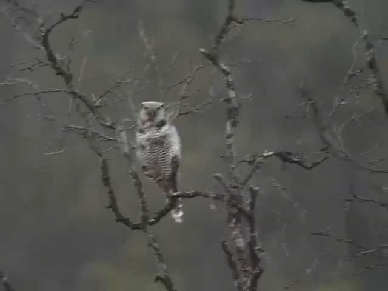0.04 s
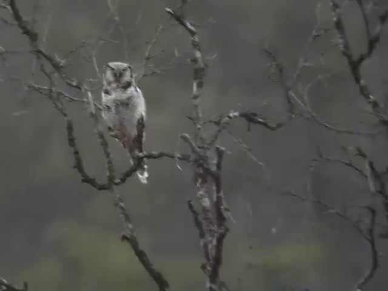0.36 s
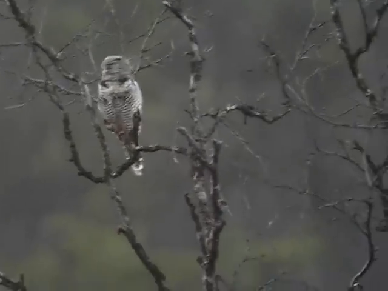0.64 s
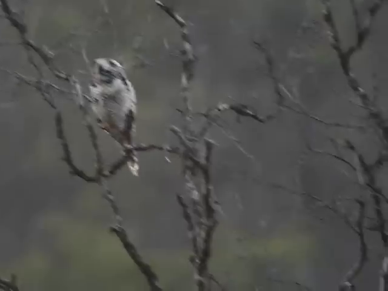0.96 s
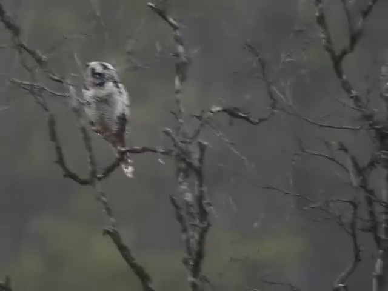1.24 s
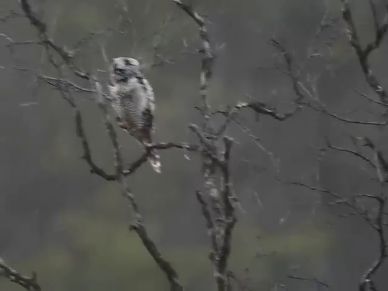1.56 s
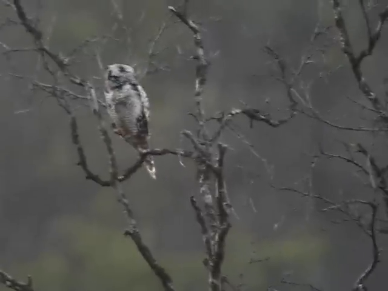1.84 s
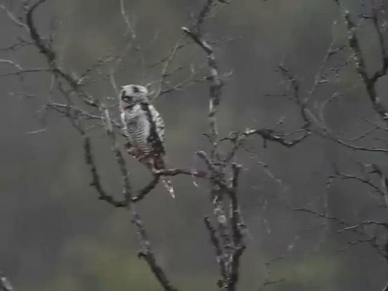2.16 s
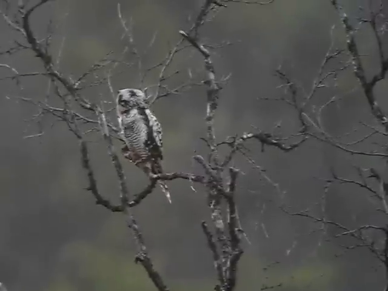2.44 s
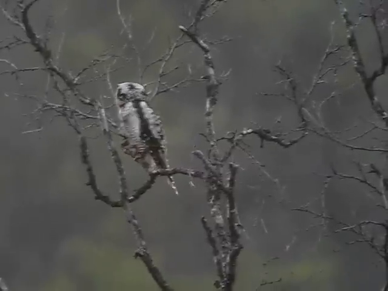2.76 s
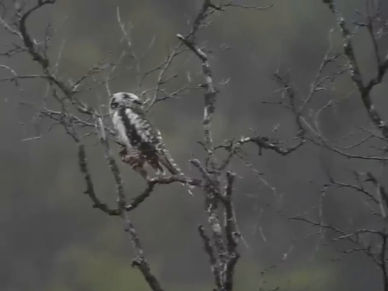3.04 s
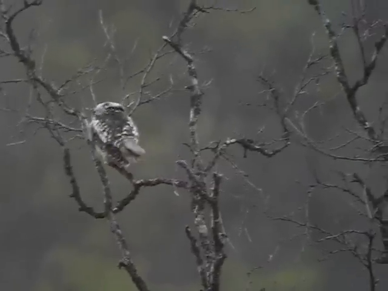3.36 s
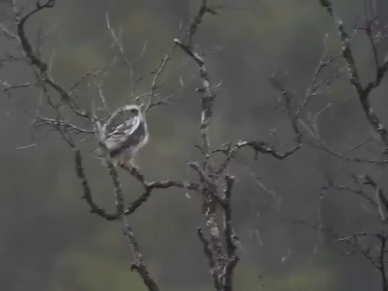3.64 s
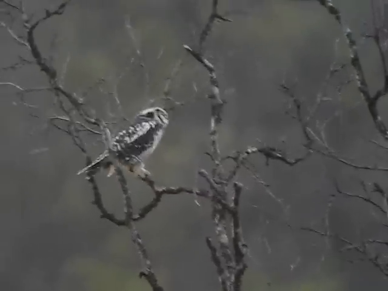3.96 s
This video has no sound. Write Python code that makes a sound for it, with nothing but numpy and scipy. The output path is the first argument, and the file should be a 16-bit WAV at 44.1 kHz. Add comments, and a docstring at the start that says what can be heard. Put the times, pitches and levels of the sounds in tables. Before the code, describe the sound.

A handled camera clicks irregularly, close up, over steady woodland air and microphone hiss. Faint high lens ticks trill through the first second, with soft brushing and a short rising squeak at 0.25. Firmer clicks land at 1.2, 1.7 to 1.8 with low thuds, 2.7, loudest at 3.05, and 3.6. A faint thin whistle sounds at 0.3 and 3.9. Dull bumps gather into a low rumble from 3.7.

```python
"""A steady rush of woodland air and microphone hiss is heard first, and at once a camera clicks in the hand.
Each impact on its plastic and metal parts excites damped modes; some firm ones add a low thud.
Faint high ticks trill through the first second, probably a stepping lens motor. A short squeak rises,
friction brushes softly, and a thin whistle sounds twice. Dull bumps pass through the camera body
and gather into a low rumble at the end."""
import sys
import numpy as np
from scipy.fft import rfft, irfft, next_fast_len
from scipy.io import wavfile
from scipy.ndimage import uniform_filter1d, map_coordinates

SR = 44100
rng = np.random.default_rng(int(sys.argv[2]) if len(sys.argv) > 2 else 0)


def inscribe(sig):
    """Save sig as 16-bit PCM at rate SR to the path in sys.argv[1].

    A 1-D sig is mono; a 2-D sig holds one channel per row.
    Samples are clipped to [-1, 1] before scaling.
    """
    pcm = np.round(np.clip(np.atleast_2d(sig).T, -1, 1) * 32767)
    wavfile.write(sys.argv[1], SR, pcm.astype(np.int16))


N = 176400


def amp(db):
    """Amplitude ratio of a level in decibels."""
    return 10 ** (np.asarray(db) / 20)


def unit(x):
    """Normalisation to an rms of 1."""
    return x / np.sqrt(np.mean(x ** 2) + 1e-20)


def along(points, hz):
    """Interpolation of (frequency, level) points on a logarithmic frequency axis."""
    point_hz, point_db = np.transpose(points)
    return np.interp(np.log(hz + 1), np.log(point_hz + 1), point_db)


def wobble(rate):
    """Smooth random modulation: a spline through `rate` Gaussian knots a second."""
    knots = rng.standard_normal(int(N * rate / SR) + 4)
    return map_coordinates(knots, [np.arange(N) * rate / SR])


def filtered(x, gain_db):
    """Zero-phase filtering by a gain given as a function of frequency."""
    size = next_fast_len(N + SR // 4)
    hz = np.fft.rfftfreq(size, 1 / SR)
    return irfft(rfft(x, size) * amp(gain_db(hz)), size)[:N]


def noise(colour_db):
    """Spectral shaping of white noise, at an rms of 1."""
    return unit(filtered(rng.standard_normal(N), colour_db))


def minimum_phase(gain):
    """Causal response of a given magnitude, by folding the cepstrum."""
    cepstrum = irfft(np.log(np.maximum(gain, 1e-6)))
    half = len(cepstrum) // 2
    cepstrum[1:half] *= 2
    cepstrum[half + 1:] = 0
    return np.exp(rfft(cepstrum))


def whitened(x, width_hz=450):
    """Spectral whitening: broad humps are levelled while fine structure stays."""
    spectrum = rfft(x)
    power = uniform_filter1d(np.abs(spectrum) ** 2, int(width_hz * len(x) / SR))
    return irfft(spectrum * minimum_phase(np.sqrt(power.mean() / np.abs(power))))


def swell(peak_s, rise_s, fall_s):
    """Gaussian envelope with a separate width on each side of its peak."""
    t = np.arange(N) / SR - peak_s
    return np.exp(-.5 * (t / np.where(t < 0, rise_s, fall_s)) ** 2)


def decay(t, t60_s):
    """Exponential damping, 60 dB down at t60_s."""
    return np.exp(-np.log(1000) * t / t60_s)


# Spectrum of distant air and microphone hiss: frequency_hz, relative_density_db
AIR_SPECTRUM = [(12, -44), (20, -10), (140, -9.5), (218, -6.5), (248, -3.5), (396, -5), (487, -5),
                (632, -5.5), (738, -4.5), (841, -6.5), (909, -5), (1120, -7.5), (1410, -8.5), (3080, -14),
                (7640, -16.5), (9900, -19), (12900, -111), (21800, -120)]

def air(rush_db=-53.9, sway_db=.35, hum_hz=29.9, hum_db=-70.5, whine_hz=7866, whine_db=-79.5):
    """Superposition of broadband noise, a deep hum and a faint phase-modulated electronic whine."""
    t = np.arange(N) / SR
    rush = noise(lambda hz: along(AIR_SPECTRUM, hz)) * amp(rush_db + sway_db * wobble(5))
    whine = amp(whine_db) * np.sin(2 * np.pi * whine_hz * t + 0.77 * wobble(15))
    hum = amp(hum_db) * np.sin(2 * np.pi * hum_hz * t)
    return rush + np.sqrt(2) * (whine + hum)


# Modes of the struck housing: frequency_hz, relative_level_db, t60_s
HOUSING_MODES = [(548, -35.5, 0.048), (656, -33.5, 0.046), (772, -38.5, 0.03), (1370, -26, 0.017),
                 (1652, -26.5, 0.038), (1867, -26, 0.02), (2380, -19.5, 0.016), (3180, -59, 0.0067),
                 (6730, -45, .012)]

def impact(t, ring_hz, ring_db, rattle_db):
    """Impact response: an impulse, the noise of parts settling, and freely decaying modes."""
    blow = np.zeros(len(t))
    blow[0] = 1
    chatter, rattle = (7.5, .015, .00011), (4 + rattle_db, .032, .0021)
    for tail_db, t60_s, rise_s in (chatter, rattle):
        tail = rng.standard_normal(len(t)) * decay(t, t60_s) * (1 - np.exp(-t / rise_s))
        blow += amp(tail_db) * tail / np.linalg.norm(tail)
    blow = whitened(blow)
    for mode_hz, mode_db, t60_s in [*HOUSING_MODES, (ring_hz, ring_db, .016)]:
        gain = amp(mode_db + rng.normal(0, 2))
        detuned_hz = mode_hz * rng.normal(1, .015)
        blow += gain * np.cos(2 * np.pi * detuned_hz * t) * decay(t, t60_s)
    return blow


# Contacts of the camera's parts; knock, crack and rattle are relative levels:
# start_s, level_db, ring_hz, knock_db, knock_hz, crack_db, rattle_db, tilt_db_per_octave
CONTACTS = [(0.02, -43.6, 1820, -23.5, 540, -12.9, -8.1, 1.0),
            (0.1025, -42.8, 2420, -17, 540, -16.9, -7.7, 2.0),
            (0.409, -42.8, 2430, -6.5, 670, -13.7, -7.1, 2.1),
            (0.831, -51.5, 2130, -4.4, 540, -11.6, -11.0, 1.6),
            (0.941, -43.6, 2470, -9.6, 660, -12.8, -3.5, 5.4),
            (1.16, -42.4, 1660, -1.9, 620, -16.8, -5.5, -2.9),
            (1.1785, -44.0, 2430, -11.3, 610, -16.8, -3.2, 1.0),
            (1.2342, -32.1, 2530, -14.2, 570, -20.5, -8.2, 4.0),
            (1.686, -41.6, 1420, -5.9, 620, -31.2, -7.3, -4.0),
            (1.6976, -31.0, 1340, -7.4, 700, -9.3, -9.5, 0.9),
            (1.7492, -30.5, 2350, -13.3, 630, -16.1, -11.0, 1.3),
            (1.7548, -32.1, 2550, -8.3, 610, -13.2, -6.4, -0.4),
            (1.8234, -48.9, 2920, -12.4, 530, -8.2, -1.7, 3.3),
            (1.8765, -57.8, 2420, -10.2, 460, -12.4, -6.0, 4.7),
            (1.9255, -50.6, 2420, -10.3, 380, -18.8, -11.0, 5.4),
            (1.9585, -54, 2380, -14.5, 480, -11.9, -11.0, 8.0),
            (1.9943, -42.2, 1610, -12.3, 680, -22.8, -9.5, -2.5),
            (2.1615, -50, 1140, -3.8, 600, -5.5, -10, 4.5),
            (2.732, -35.0, 1110, -9.6, 600, -22.5, -4.5, -2.9),
            (2.7792, -44.4, 2400, -7.8, 670, -15, -7.5, 5),
            (2.892, -55.1, 2410, -8.2, 450, -15.0, -7.0, 2.4),
            (2.9475, -56.8, 1840, -10.0, 490, -1.3, -11.0, 3.4),
            (3.0461, -23.6, 2420, -3.2, 660, -16.4, -10.1, 0.4), (3.0525, -37, 1400, -3, 690, -14, -6, -2),
            (3.0643, -46, 1650, -4, 690, -7, -10, -2), (3.549, -43.3, 1170, -1.4, 690, -14.7, -2.1, 0.1),
            (3.6304, -32.3, 1160, -5, 740, -10.5, -5.5, -6.0),
            (3.9145, -53.5, 2640, -12.1, 470, -4.1, -3.5, 8.0)]
# Bands a firm contact favours or swallows, by where it lands: start_s, centre_hz, width_hz, gain_db
STRIKE_BANDS = [(1.2342, 2150, 170, -22), (1.2342, 1480, 170, -1.5), (1.2342, 3150, 300, 2),
                (1.2342, 1050, 120, -2), (1.6976, 1660, 200, -7), (1.6976, 4180, 550, 9.5),
                (1.6976, 1060, 70, -9), (1.6976, 2320, 110, -11.5), (2.732, 2000, 170, 7.5),
                (2.732, 1150, 90, 4), (2.732, 2560, 200, -0.5), (2.732, 3200, 150, 2.5),
                (3.0461, 400, 70, -11), (3.0461, 3400, 250, 0), (3.0461, 2020, 130, -8),
                (3.0461, 2550, 110, -5.5), (3.6304, 1640, 150, -1), (3.6304, 2050, 200, 3.5),
                (3.6304, 2870, 140, -15)]
# Spectra of a click's low knock, middle snap and high crack: frequency_hz, gain_db
KNOCK_SPECTRUM = [(40, -42), (130, -22), (260, -16), (420, -14), (540, -3), (670, 0), (850, -1),
                  (1100, -13), (2500, -60)]
SNAP_SPECTRUM = [(300, -50), (750, -14), (1000, -3), (1400, 0), (1900, 0), (2600, 0), (3300, -5),
                 (3900, -18), (6000, -45), (10000, -70)]
CRACK_SPECTRUM = [(2000, -40), (3500, -4), (4300, 0), (5400, -3), (7300, -5), (8500, -11), (10000, -19)]

def clicks(size=8192, spread_s=.00062, spread_hz=3500, soft_below_db=-38, rms_span_s=.01):
    """Dispersion of bending waves smears each impact, so that the lows arrive after the highs."""
    out = np.zeros(N + SR)
    t, hz = np.arange(size) / SR, np.fft.rfftfreq(size, 1 / SR)
    group_delay_s = spread_s / (1 + (hz / spread_hz) ** 2)
    dispersion = np.exp(-2j * np.pi * np.cumsum(group_delay_s) * hz[1])
    for start_s, level_db, ring_hz, knock_db, knock_hz, crack_db, rattle_db, tilt in CONTACTS:
        softness_db = max(soft_below_db - level_db, 0)  # soft contacts ring more and crack less
        blow = impact(t, ring_hz, -21 + .45 * softness_db, rattle_db)
        spectrum = rfft(blow) * dispersion
        tilt_db = tilt * np.log2(np.clip(hz, 1000, 2600) / 2000)
        bands_db = sum(gain_db * np.exp(-.5 * ((hz - centre_hz) / width_hz) ** 2)
                       for at_s, centre_hz, width_hz, gain_db in STRIKE_BANDS
                       if abs(at_s - start_s) < .004)
        knock = (knock_db + .15, along(KNOCK_SPECTRUM, hz * 640 / knock_hz))
        snap = (-.07, along(SNAP_SPECTRUM, hz) + tilt_db)
        crack = (crack_db - 1.25 - .35 * softness_db, along(CRACK_SPECTRUM, hz))
        onset = round((start_s - spread_s / 2) * SR)
        for part_db, colour_db in (knock, snap, crack):
            part = irfft(spectrum * minimum_phase(amp(colour_db + bands_db)))
            part *= np.sqrt(rms_span_s * SR) / np.linalg.norm(part)
            out[onset:onset + size] += amp(level_db + part_db) * part
    return out[:N]


# Trains of tiny ticks, probably the lens motor stepping: start_s, end_s, level_db
TICK_TRAINS = [(0.1365, 0.162, -51), (0.2545, 0.362, -50), (0.5545, 0.629, -51.5), (0.755, 0.896, -51.5),
               (0.9875, 1.163, -51.5)]
# Spectrum of a tick: frequency_hz, relative_density_db
TICK_SPECTRUM = [(3000, -30), (4700, -16), (5400, -7), (6100, -16), (6800, -14), (7250, -4), (7700, -12),
                 (8300, -3), (8900, 0), (9900, -5), (11000, -20)]

def trills(rate_hz=60, tick_s=.003, t60_s=.022, onset_boost_db=4):
    """Periodic gating of high noise makes a pulse train of sharp, evenly spaced ticks."""
    t, gate = np.arange(N) / SR, np.zeros(N)
    for start_s, end_s, level_db in TICK_TRAINS:
        age_s = (t - start_s) % (1 / rate_hz)
        sounding = (age_s < tick_s) & (t >= start_s) & (t < end_s)
        gate += amp(level_db + onset_boost_db) * decay(age_s, t60_s) * sounding
    return gate * noise(lambda hz: along(TICK_SPECTRUM, hz))


# Course of the squeak: time_s, pitch_hz, fundamental_db, second_harmonic_db
SQUEAK_GLIDE = [(0.219, 315, -71, -84), (0.226, 359, -58, -44), (0.232, 383, -52, -44),
                (0.234, 427, -45, -50), (0.242, 469, -30.5, -54), (0.247, 554, -30, -43),
                (.254, 603, -36, -59), (.260, 587, -45, -51), (0.274, 467, -72, -56)]

def squeak(jitter=.024, fall_db_per_octave=9.5):
    """A harmonic series glides upward, buzzy at first, then nearly pure as its fundamental dominates."""
    t = np.arange(N) / SR
    times_s, *columns = np.transpose(SQUEAK_GLIDE)
    pitch_hz, fundamental_db, second_db = [np.interp(t, times_s, column) for column in columns]
    phase = 2 * np.pi * np.cumsum(pitch_hz * (1 + jitter * wobble(289))) / SR
    overtones = sum(amp(-fall_db_per_octave * np.log2(k / 2)) * np.sin(k * phase) for k in range(2, 6))
    sounding = (t > times_s[0]) & (t < times_s[-1])
    return (amp(fundamental_db) * np.sin(phase) + amp(second_db) * overtones) * sounding


# Soft brushing strokes: peak_s, level_db, rise_s, fall_s, treble_db
STROKES = [(0.25, -45.5, 0.005, 0.0046, 13), (.28, -53, 0.046, 0.062, 3.5),
           (0.459, -46.5, 0.058, 0.05, -2.5), (.6, -57.5, 0.2, 0.83, -3), (.91, -53, 0.027, 0.036, 20),
           (1.178, -48, 0.043, 0.08, -5), (1.3, -58, 0.067, 0.19, -8.5), (1.93, -59.5, 0.032, 0.23, 2),
           (2.879, -67, 0.11, 0.075, -11), (3.91, -76, 0.018, 0.035, 7)]
# Spectrum of the friction: frequency_hz, relative_density_db
FRICTION_SPECTRUM = [(100, -17.5), (300, -6), (650, -1.5), (1500, -5), (2500, -5.5), (3700, -8.5),
                     (5500, -21), (10000, -24.5)]

def brushing(shelf_hz=1400, grain_db=2.1, grain_rate_hz=450):
    """Friction noise swells with each stroke; fast random amplitude modulation makes it grainy."""
    def shelf(hz):
        return 1 - 1 / (1 + (hz / shelf_hz) ** 6)

    out = np.zeros(N)
    for peak_s, level_db, rise_s, fall_s, treble_db in STROKES:
        friction = noise(lambda hz: along(FRICTION_SPECTRUM, hz) + treble_db * shelf(hz))
        out += amp(level_db) * swell(peak_s, rise_s, fall_s) * friction
    return out * unit(amp(grain_db * wobble(grain_rate_hz)))


# Faint, thin whistles: start_s, end_s, pitch_hz, level_db
WHISTLE_NOTES = [(0.294, .41, 2660, -62), (3.9, 4.05, 2590, -62)]

def whistles(jitter=.011, ramp_s=.012):
    """Random frequency modulation makes each high pure tone slightly unsteady."""
    t, out = np.arange(N) / SR, np.zeros(N)
    for start_s, end_s, pitch_hz, level_db in WHISTLE_NOTES:
        gate = np.clip(np.minimum(t - start_s, end_s - t) / ramp_s, 0, 1)
        phase = 2 * np.pi * np.cumsum(pitch_hz * (1 + jitter * wobble(170))) / SR
        out += amp(level_db) * gate * np.sqrt(2) * np.sin(phase)
    return out


# Dull handling bumps: peak_s, level_db, rise_s, fall_s
BUMPS = [(1.16, -56.5, 0.011, 0.018), (1.755, -56, .005, 0.0069), (3.275, -58, 0.011, 0.013),
         (3.77, -55.5, 0.04, 0.04), (3.87, -53, 0.028, 0.018), (3.95, -54.5, 0.03, 0.09)]
# Spectrum of the bumps: frequency_hz, relative_density_db
BUMP_SPECTRUM = [(20, -14), (70, 2.5), (120, 0), (280, -6.5), (500, -19), (1500, -60)]

def rumble():
    """Structure-borne sound: handling passes through the camera body as swells of low noise."""
    envelope = sum(amp(level_db) * swell(peak_s, rise_s, fall_s)
                   for peak_s, level_db, rise_s, fall_s in BUMPS)
    return envelope * noise(lambda hz: along(BUMP_SPECTRUM, hz))


# Thuds of the camera body under firm clicks: start_s, pitch_hz, level_db
BODY_THUDS = [(1.234, 353, -41), (1.698, 388, -38.5), (1.7502, 450, -38), (1.755, 323, -42.5)]

def thuds(t60_s=.053, rise_s=.00073):
    """The struck body rings briefly at a low pitch, as a damped harmonic oscillator."""
    out = np.zeros(N)
    for start_s, pitch_hz, level_db in BODY_THUDS:
        age_s = np.maximum(np.arange(N) / SR - start_s, 0)
        envelope = decay(age_s, t60_s) * (1 - np.exp(-age_s / rise_s))
        out += amp(level_db) * envelope * np.sin(2 * np.pi * pitch_hz * age_s)
    return out


def scene():
    """Linear superposition of all sources at one microphone."""
    return (air() + clicks() + trills() + squeak() + brushing() + whistles() + rumble() + thuds())[None]


# Steep low-pass curve: frequency_hz, gain_db
TREBLE_CUTOFF = [(10000, 0), (10200, -5), (10400, -37), (12500, -48), (14000, -80)]

def record(dry):
    """Steep low-pass filtering: the sound has almost no treble above 10 kHz."""
    return np.array([filtered(channel, lambda hz: along(TREBLE_CUTOFF, hz)) for channel in dry])


dry = scene()
out = record(dry)
inscribe(out)
```